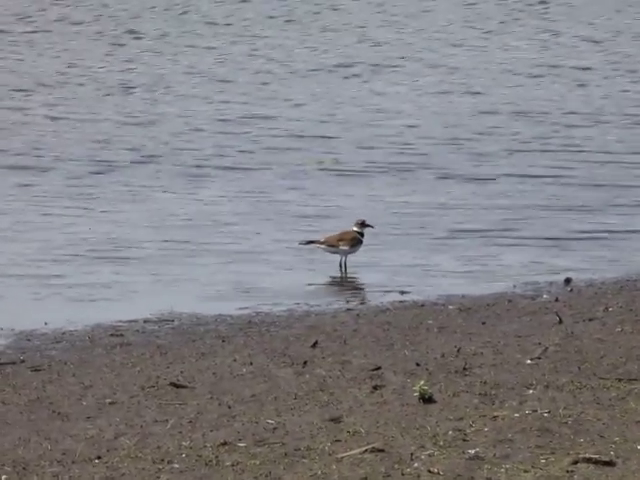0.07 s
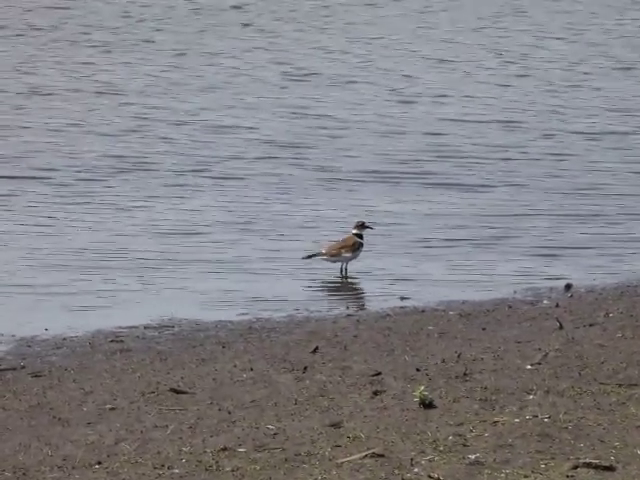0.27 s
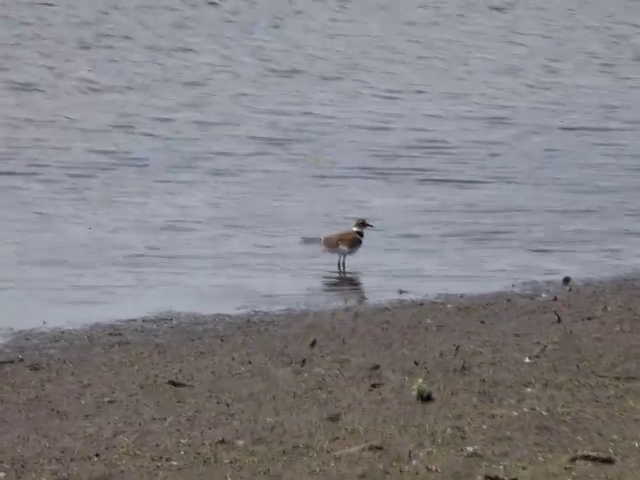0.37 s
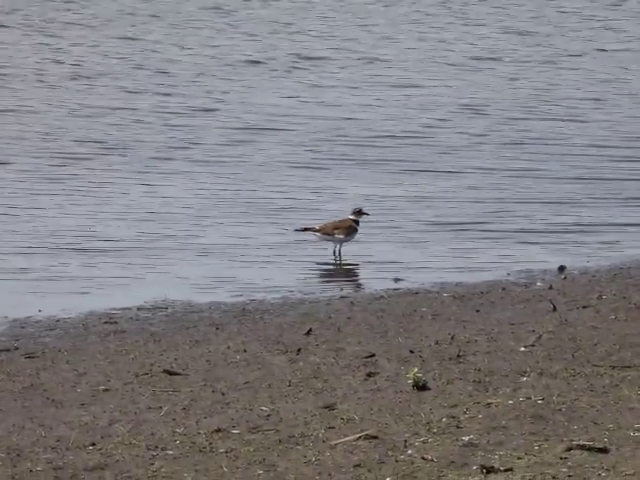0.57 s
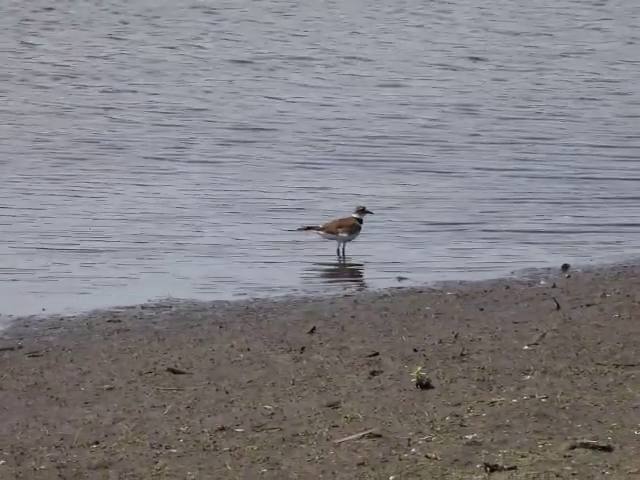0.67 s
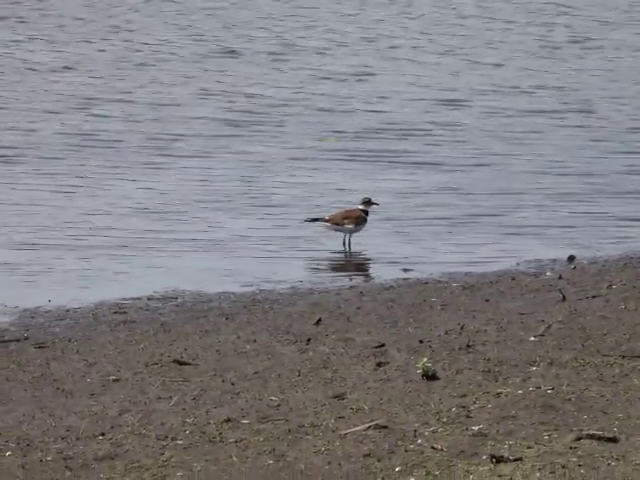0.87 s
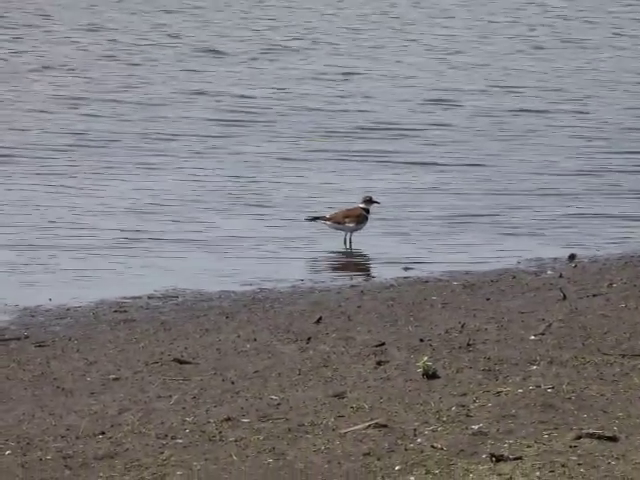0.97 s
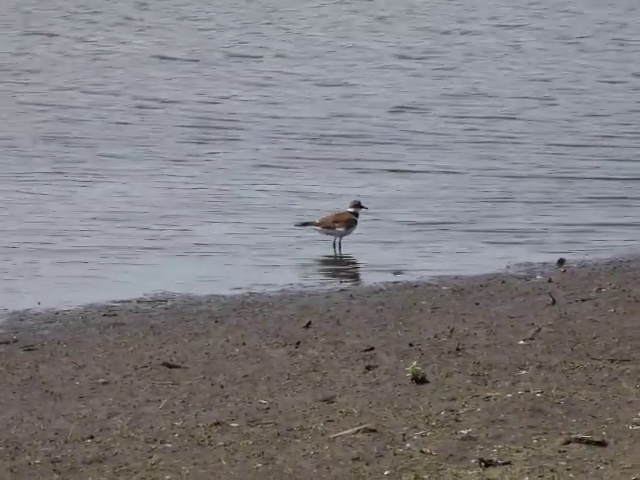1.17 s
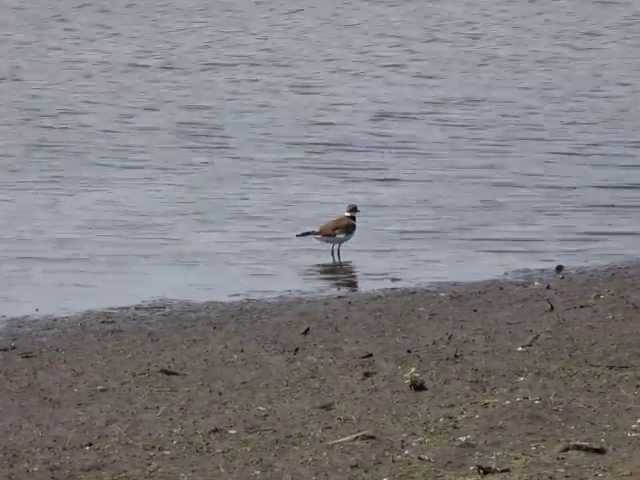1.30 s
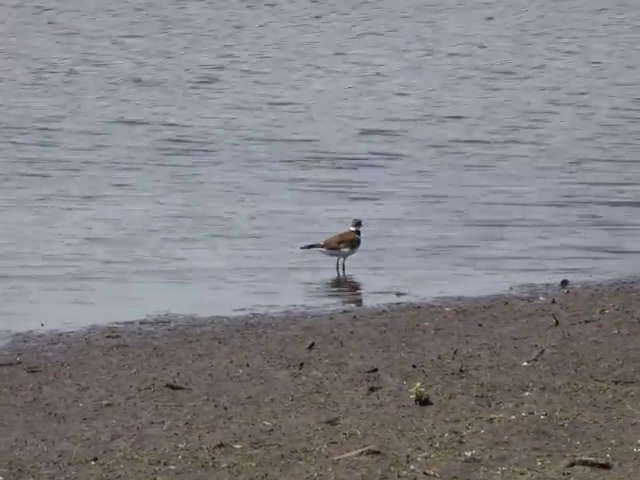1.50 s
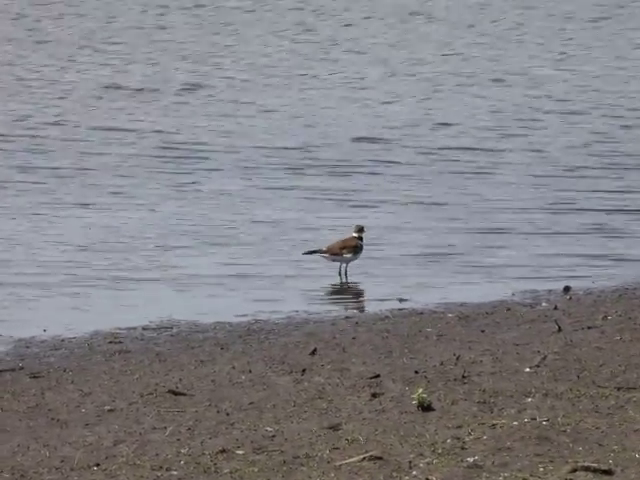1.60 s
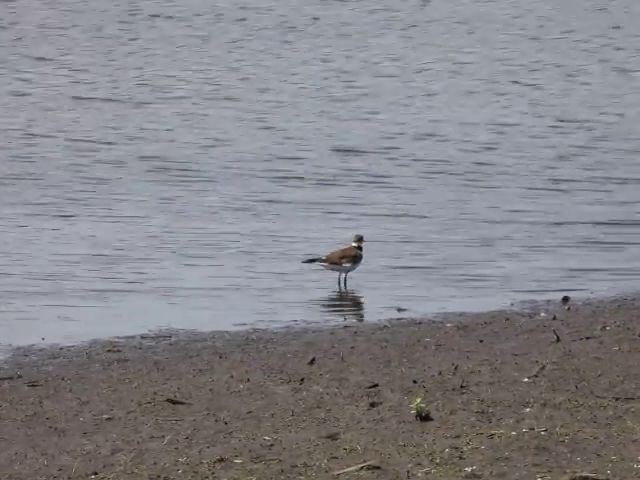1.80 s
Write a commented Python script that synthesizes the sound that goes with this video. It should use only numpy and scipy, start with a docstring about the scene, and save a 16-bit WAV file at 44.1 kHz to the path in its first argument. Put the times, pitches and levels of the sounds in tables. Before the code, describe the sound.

Low, uneven wind buffeting hits the microphone beside the water. Two faint, brief peeps come from a distant shorebird before a strong gust crackles through and fades to weaker thumps, while a soft hiss continues.

```python
"""A camera microphone on an open shore in a gusty breeze. From the start, low turbulence rumbles
under the steady hiss of water and air and a faint drone, and eddies thump and pop on the capsule.
A distant bird pipes faintly at the outset and again at 0.4 s. One hard gust peaks at 0.6 s;
the recorder's gain control ducks in it and creeps back up. Weaker thumps follow as the wind eases."""
import sys
import numpy as np
from scipy import signal
from scipy.fft import rfft, irfft
from scipy.io import wavfile

SR = 44100
rng = np.random.default_rng(int(sys.argv[2]) if len(sys.argv) > 2 else 0)


def dump_mix(stems):
    """Bounce the given channels to the path in sys.argv[1] as a 16-bit WAV at rate SR."""
    frames = np.atleast_2d(stems).T  # one column per channel
    limited = np.clip(frames, -1, 1)  # hard clip at full scale
    pcm = np.round(limited * 32767).astype(np.int16)
    wavfile.write(sys.argv[1], SR, pcm)


N = 81585

# Turbulence between the thumps: time_s, level_db, upper_edge_hz
TURBULENCE_CURVE = [(0, -30.5, 201), (.4, -30, 215), (.44, -17, 251), (.48, -22, 202), (.53, -24, 255),
                    (.575, -16, 350), (.6, -2, 520), (.615, -21.5, 250), (.66, -22, 203), (.69, -19.5, 257),
                    (.73, -34, 206), (.84, -27, 245), (.9, -37, 146), (1.05, -40.5, 132), (1.22, -43, 154),
                    (1.43, -42.5, 148), (1.5, -27.5, 194), (1.58, -43, 150), (1.85, -39, 150)]
# Spectrum of the shore hiss: frequency_hz, relative_density_db
HISS_SPECTRUM = [(250, 3.5), (450, -3), (650, -7), (900, -14.5), (1460, -9), (2250, -11.5), (3500, -10),
                 (5500, -9.5), (7200, -7), (8500, -4), (9300, -7), (10300, -13), (13000, -22.5),
                 (15500, -32.5)]
# Envelope of the shore hiss: time_s, level_db
HISS_ENVELOPE = [(0, -42.5), (.55, -43), (.85, -43.5), (1.1, -40.5), (1.27, -41), (1.315, -39),
                 (1.35, -40.5), (1.55, -40), (1.7, -39), (1.85, -38)]
# Envelope of the drone: time_s, level_db
DRONE_ENVELOPE = [(0, -70), (.2, -65), (.37, -61), (.45, -69), (.9, -68), (1.07, -64), (1.2, -67),
                  (1.85, -66)]
# Contour of one bird note: time_in_note_s, pitch_hz, level_db
BIRD_NOTE = [(0, 2930, -51), (.007, 2880, -30), (.018, 2822, -34), (.031, 2923, -31), (0.044, 2870, -33),
             (.058, 2980, -39), (.068, 3080, -52)]
# Bird calls: start_s, gain_db
BIRD_CALLS = [(-.045, -8), (0.393, -0.5)]
# Eddies striking the capsule: centre_s, level_db, pitch_hz
EDDY_THUMPS = [(0.013, -15.5, 127), (0.051, -32, 86), (0.082, -17, 106), (0.109, -18.5, 133),
               (0.165, -18, 116), (0.189, -26, 166), (0.212, -18, 138), (0.225, -20, 130), (0.239, -14, 97),
               (0.259, -16.5, 193), (0.284, -11, 94), (0.328, -23.5, 83), (0.382, -19.5, 101),
               (0.408, -35, 91), (0.434, -7, 124), (0.445, -13, 129), (0.46, -6.5, 93.5), (0.534, -10, 136),
               (0.546, -8, 125), (0.568, -12.5, 190), (0.584, -6, 144), (0.6, -3, 203), (0.625, -15.5, 93),
               (0.65, -21, 116), (0.678, -1, 116), (0.691, -14, 113), (0.707, -9, 204), (0.744, -17.5, 115),
               (0.774, -29, 93), (0.791, -15, 88), (0.829, -27, 130), (0.841, -12, 117), (0.879, -13, 158),
               (1.026, -25, 73), (1.049, -26.5, 85), (1.07, -22.5, 74), (1.121, -24.5, 129),
               (1.144, -25, 117), (1.165, -22, 106), (1.33, -30, 100), (1.46, -15.5, 170),
               (1.483, -12, 124), (1.522, -20, 112), (1.553, -24.5, 101), (1.623, -23.5, 103),
               (1.679, -30.5, 79), (1.758, -28.5, 86), (1.806, -29, 77), (1.842, -22, 139)]
# Sharp pops riding on the eddies: centre_s, level_db, half_width_ms
EDDY_POPS = [(.013, -25.5, 1.4), (.108, -24, 1.44), (.211, -24, 1.3), (.260, -22.5, 1.3), (.431, -19, 0.95),
             (.467, -16, 0.99), (.544, -21, 1.3), (.566, -19.5, .65), (.572, -21, 1.2), (.5845, -6.5, 0.72),
             (.595, -9, 0.73), (.5985, -2, 0.89), (0.603, -2, 0.73), (0.606, -16, 0.93), (0.676, -15, 0.76),
             (0.704, -12.5, 1.1), (.839, -21, 1), (0.881, -26.5, 1.27), (1.484, -24.5, 1.5)]

TIME_S = np.arange(N) / SR
PULSE_LEAD, PULSE_SAMPLES = 1000, 3000  # samples before a pulse's centre, and in all
PULSE_TIME_S = (np.arange(PULSE_SAMPLES) - PULSE_LEAD) / SR


def amp(db):
    return 10 ** (np.asarray(db) / 20)


def unit_rms(x):
    return x / np.sqrt(np.mean(x ** 2) + 1e-20)


def curves(rows):
    """Linear interpolation of table columns over time."""
    times_s, *columns = np.transpose(rows)
    return [np.interp(TIME_S, times_s, column) for column in columns]


def drift(rate_hz):
    """Low-pass filtered noise wanders slowly, with a spread of about 1."""
    step = 40  # samples per point
    pole = np.exp(-2 * np.pi * rate_hz * step / SR)
    white = rng.standard_normal(N // step + 2002)
    slow = signal.lfilter([1], [1, -2 * pole, pole * pole], white)[2000:]
    return np.interp(np.arange(N) / step, np.arange(len(slow)), unit_rms(slow))


def butter(x, hz, kind, order=2):
    return signal.sosfilt(signal.butter(order, hz, kind, fs=SR, output="sos"), x)


def superpose(pulses):
    """Linear superposition of (centre_s, waveform) pressure pulses."""
    out = np.zeros(PULSE_LEAD + N + PULSE_SAMPLES)
    for centre_s, pulse in pulses:
        first = int(centre_s * SR)
        out[first:first + PULSE_SAMPLES] += pulse
    return out[PULSE_LEAD:PULSE_LEAD + N]


def turbulence(lower_edge_hz=63.6, top_hz=1190, lumps_db=2.5):
    """Turbulent pressure fluctuations: low noise whose bandwidth widens as the gust hardens."""
    level_db, upper_edge_hz = curves(TURBULENCE_CURVE)
    white = rng.standard_normal((2, N + SR))
    envelope = amp(level_db + lumps_db * drift(rate_hz=25))
    edges_hz = np.geomspace(25, 1600, 13)
    rumble, power = 0, 0
    for k, (low, high) in enumerate(zip(edges_hz, edges_hz[1:])):
        hz = np.sqrt(low * high)
        treble_rolloff = (1 + (hz / upper_edge_hz) ** 6.23) ** -.5
        bass_rolloff = (1 + (lower_edge_hz / hz) ** 2.8) ** -.5
        weight = treble_rolloff * bass_rolloff * (hz / 100) ** -.6
        rumble += weight * butter(white[k % 2], [low, high], "band")[SR:]
        power += weight ** 2 * (high - low) * 2 / SR
    return butter(envelope * rumble / np.sqrt(power), top_hz, "low", order=4)


def shore_hiss():
    """Broadband noise of water and air; random amplitude modulation makes each octave flicker."""
    hz = np.maximum(np.fft.rfftfreq(N, 1 / SR), 1)
    points_hz, density_db = np.transpose(HISS_SPECTRUM)
    colour = amp(np.interp(np.log(hz), np.log(points_hz), density_db, left=-60))
    shared_db = .41 * drift(rate_hz=8.7)
    spectrum = rfft(rng.standard_normal(N)) * colour
    hiss = 0
    for octave in range(8, 15):  # centres from 256 to 16384 Hz
        band = np.clip(1 - np.abs(np.log2(hz) - octave), 0, 1)
        flicker = amp(shared_db + 1.16 * drift(rate_hz=26))
        hiss += flicker * irfft(spectrum * band, N)
    return amp(curves(HISS_ENVELOPE)[0]) * unit_rms(hiss)


def drone(pitch_hz=1476, width_hz=70):
    """Narrow-band noise is heard as a faint pitch at its centre frequency."""
    band = butter(rng.standard_normal(N), [pitch_hz - width_hz / 2, pitch_hz + width_hz / 2], "band")
    return amp(curves(DRONE_ENVELOPE)[0]) * unit_rms(band)


def bird(echo_t60_s=.08, echo_db=-20):
    """A frequency-modulated sine, smeared by diffuse reflection off the water."""
    note_s, pitch_hz, level_db = np.transpose(BIRD_NOTE)
    direct = np.zeros(N)
    for start_s, gain_db in BIRD_CALLS:
        age_s = TIME_S - start_s
        rms = amp(gain_db + np.interp(age_s, note_s, level_db, left=-200, right=-200))
        phase = 2 * np.pi * np.cumsum(np.interp(age_s, note_s, pitch_hz)) / SR
        direct += np.sqrt(2) * rms * np.sin(phase)
    delay_s = np.arange(SR // 5) / SR
    echo = rng.standard_normal(len(delay_s)) * amp(-60 * delay_s / echo_t60_s)
    return direct + amp(echo_db) * signal.fftconvolve(direct, echo / np.linalg.norm(echo))[:N]


def eddy_thumps(width_cycles=.36):
    """Each eddy pushes or pulls the capsule: a lopsided pressure swing of about one cycle."""
    pulses = []
    for centre_s, level_db, pitch_hz in EDDY_THUMPS:
        polarity, skew = rng.uniform(-1, 1, 2)
        cycles = pitch_hz * PULSE_TIME_S
        window = np.exp(-.5 * (cycles / width_cycles) ** 2)
        swing = window * np.cos(2 * np.pi * cycles + 1.2 * skew)
        pulses.append((centre_s, amp(level_db) * np.sign(polarity) * swing))
    return superpose(pulses)


def eddy_pops():
    """Hard eddies carry two-sided pressure spikes; the briefer the spike, the wider its spectrum."""
    pulses = []
    for centre_s, level_db, half_width_ms in EDDY_POPS:
        polarity, skew = rng.uniform(-.83, 1, 2)
        scaled_time = 1000 * PULSE_TIME_S / half_width_ms
        spike = np.real(np.exp(1j * skew) / (1 - 1j * scaled_time) ** 3)
        pulses.append((centre_s, amp(level_db) * np.sign(polarity) * spike))
    return superpose(pulses)


def scene():
    """Pressures from the wind and the shore add at a single microphone."""
    wind = eddy_thumps() + eddy_pops() + turbulence()
    return (wind + shore_hiss() + drone() + bird())[None]


def record(dry, threshold_db=-15, duck_share=.42, attack_s=.025, release_db_per_s=24):
    """Band limiting and compression: the gain falls in loud gusts, and saturation rounds the peaks."""
    x = butter(dry, hz=40.7, kind="high")
    pole = np.exp(-1 / (attack_s * SR))
    power = signal.lfilter([1 - pole], [1, -pole], x[0] ** 2)
    level_db = 10 * np.log10(power + 1e-12)
    release_db = release_db_per_s * TIME_S
    held_db = np.maximum.accumulate(level_db + release_db) - release_db  # decaying peak hold
    ducked = x * amp(-duck_share * np.maximum(held_db - threshold_db, 0))
    rounded = ducked / (1 + ducked ** 4) ** .25
    top_cut = signal.ellip(12, .1, 80, 15700, fs=SR, output="sos")  # steep above 15.7 kHz
    return signal.sosfilt(top_cut, rounded)


dry = scene()
out = record(dry)
dump_mix(out)
```